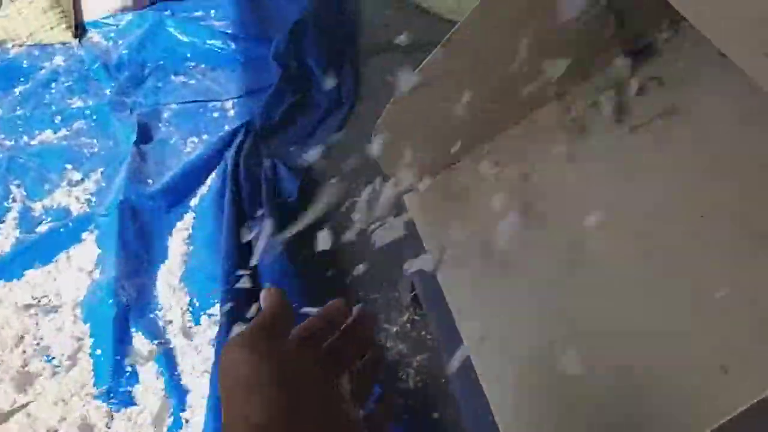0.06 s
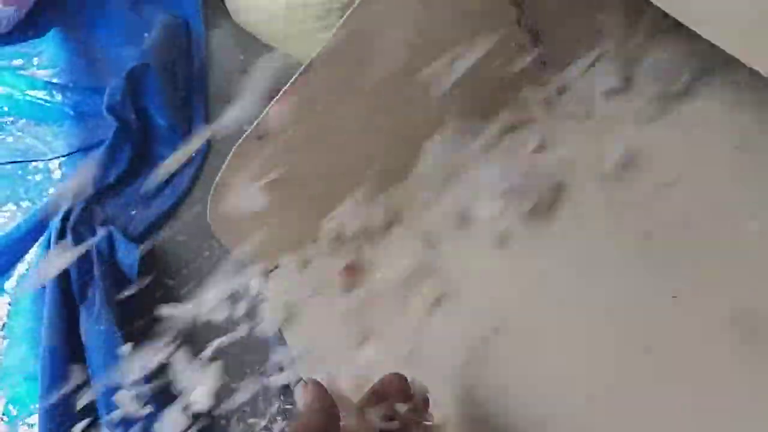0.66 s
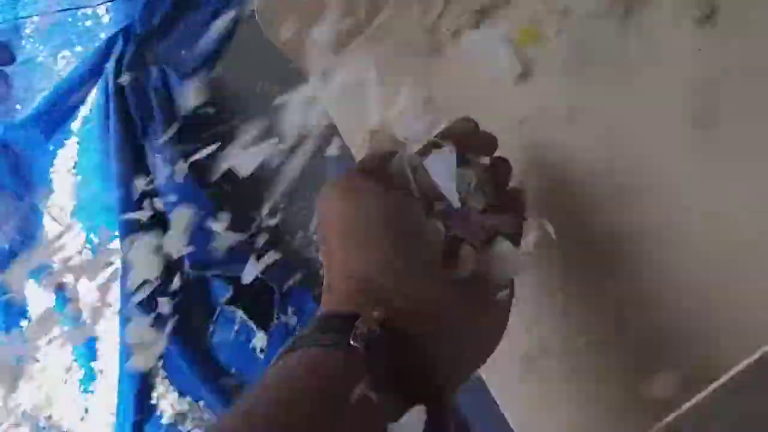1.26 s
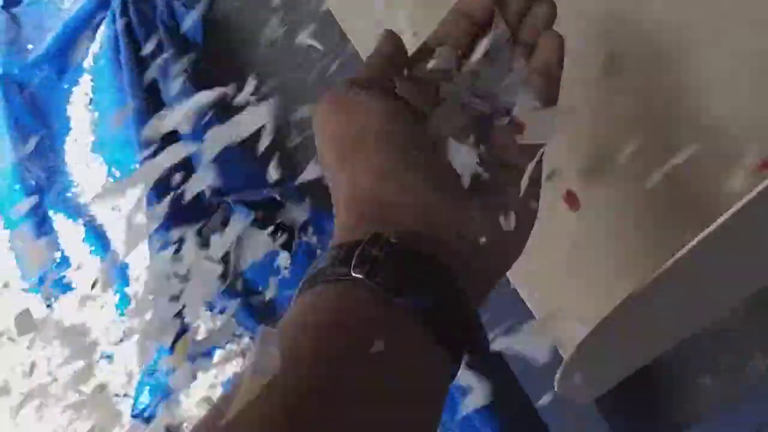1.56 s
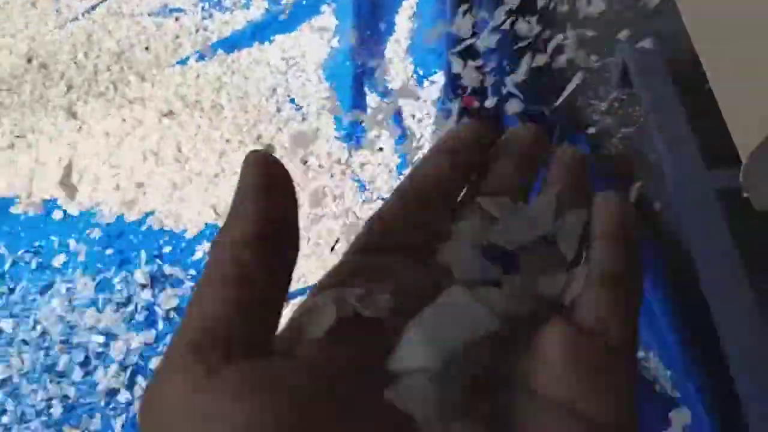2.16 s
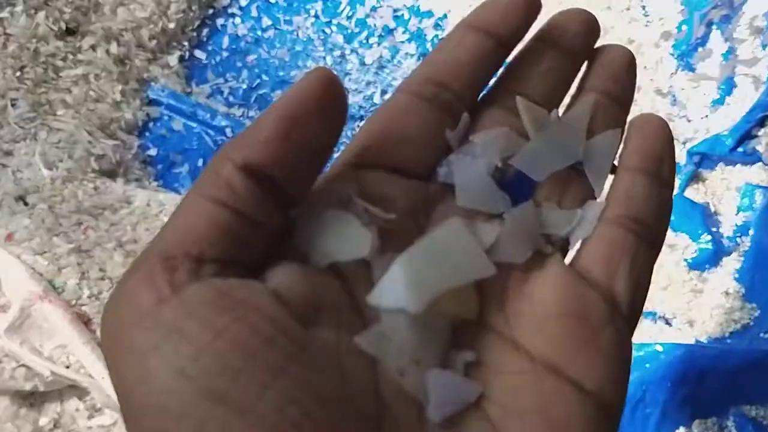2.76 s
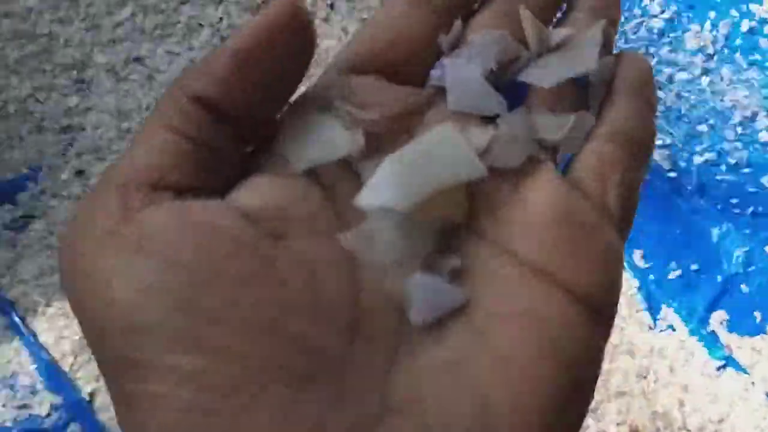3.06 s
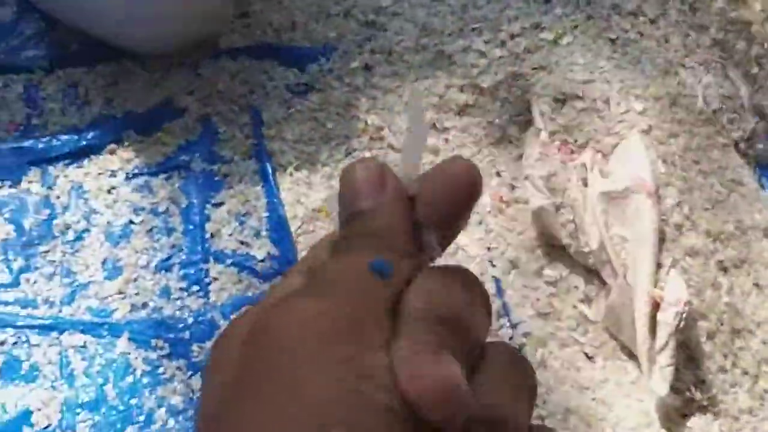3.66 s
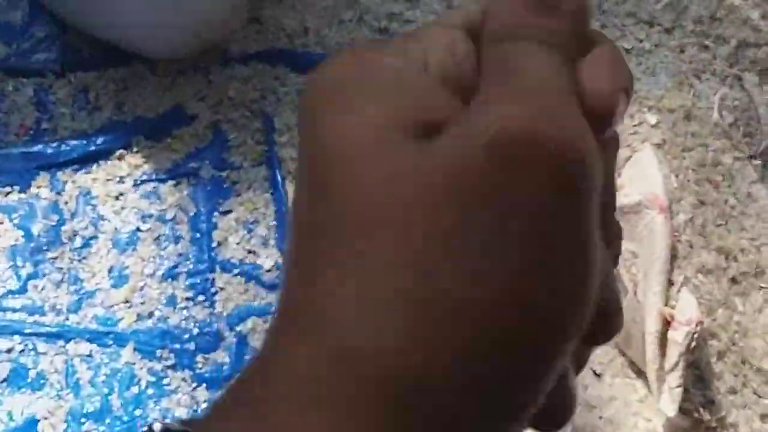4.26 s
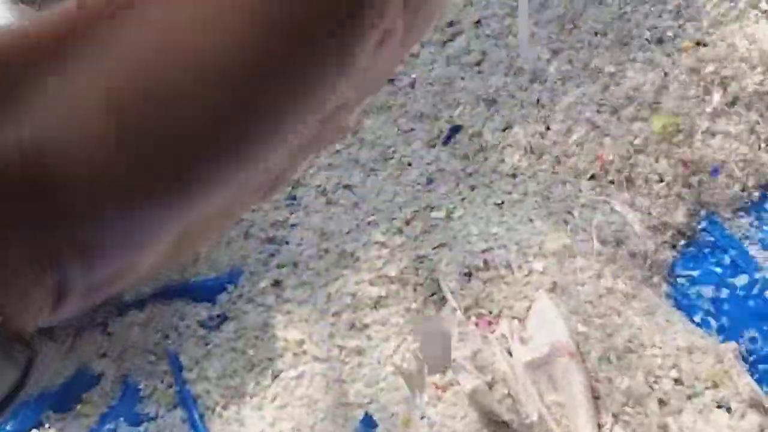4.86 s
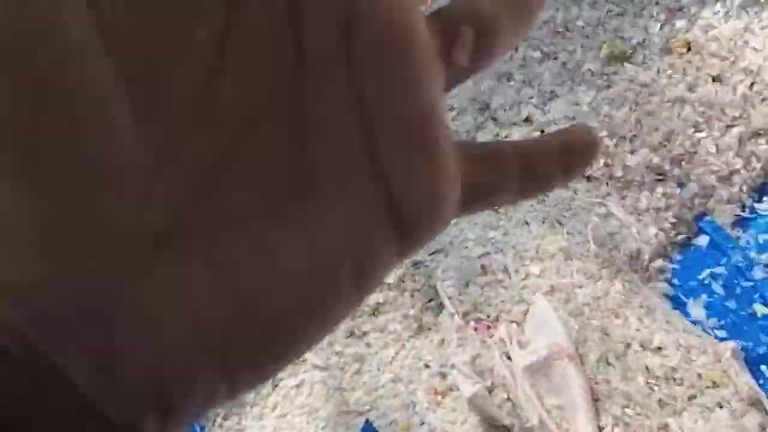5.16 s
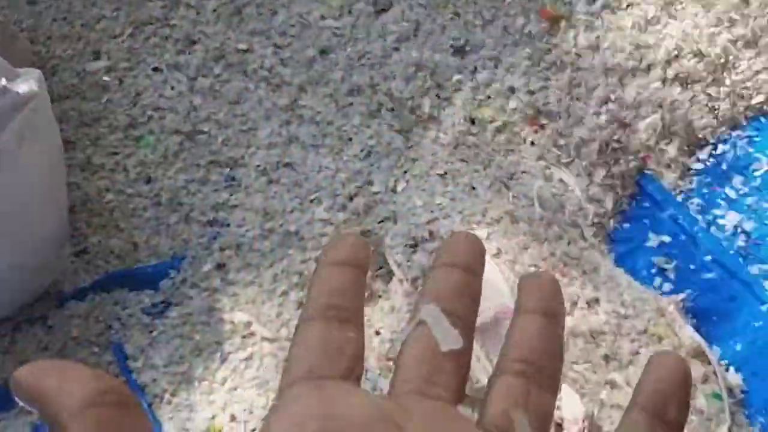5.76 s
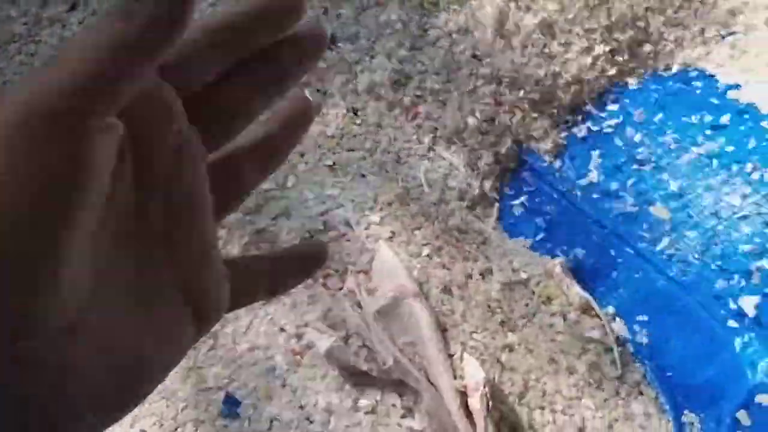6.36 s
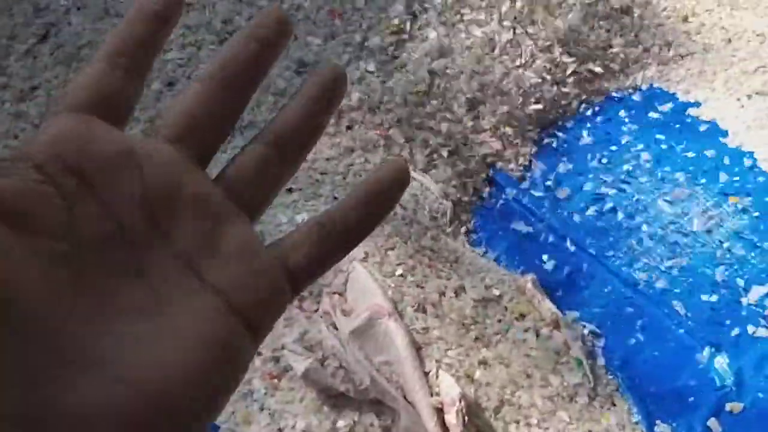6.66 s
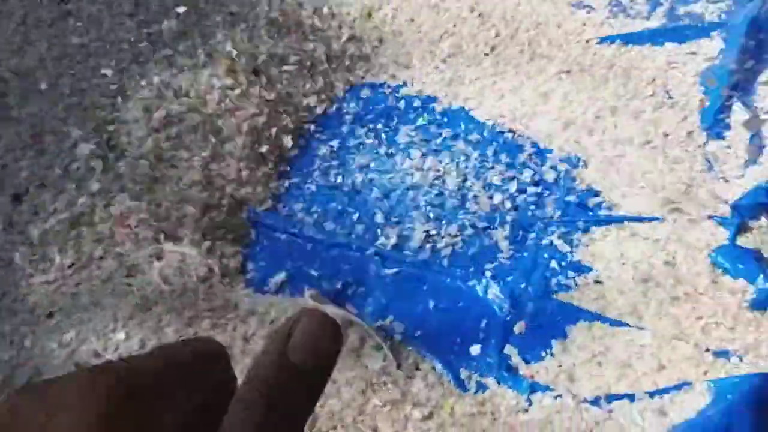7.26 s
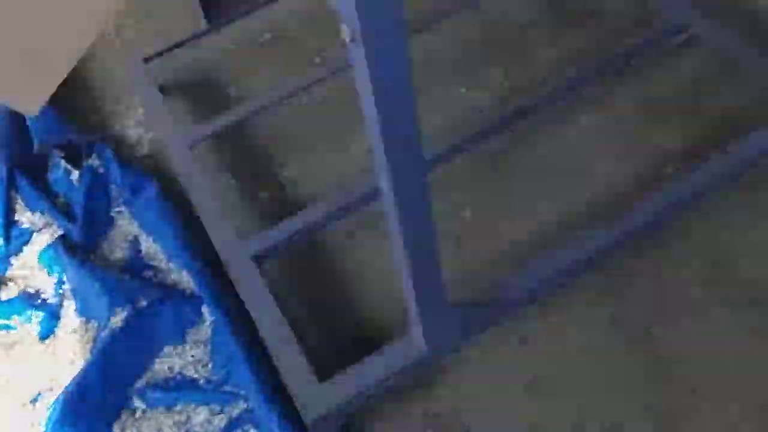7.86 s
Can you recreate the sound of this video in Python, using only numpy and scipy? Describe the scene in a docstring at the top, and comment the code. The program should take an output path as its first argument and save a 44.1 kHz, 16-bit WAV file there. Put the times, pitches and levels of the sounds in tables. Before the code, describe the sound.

From the first instant, a dense hail of plastic flakes rattles round a dryer's steel drum and blows from the chute, a bright, wide hiss full of tiny ticks. Beneath it run hollow rushing air, a low blower rumble and the drum's hum. The flow throbs slightly, about five times a second, with brief small surges and a dull puff at 0.3 seconds. A light draught buffets the microphone, fading between 1.4 and 2 seconds. Near 1.5 seconds, flakes land on a palm with a soft, dull slap. The hail eases a little from about 1.5 to 3.5 seconds, then recovers. A faint motor whine rises around 2.5 seconds and again from 3.5 to 4.2. A tiny, dull tap comes at 4.5 seconds as the flakes are tossed away. The low drone grows slightly near 7.5 seconds, and everything is still running at the end, near 8 seconds.

```python
"""Plastic scrap in a centrifugal dryer.

Heard in a workshop yard, beside the outlet chute: a hail of flakes is flung round the steel drum and
blown out with the air, while blower, drum and motor hum underneath. A hand catches a few flakes.
The listener starts in the draught of the chute, steps out of it, turns away and turns back."""
import sys
import numpy as np
from scipy import signal
from scipy.fft import rfft, irfft
from scipy.io import wavfile
from scipy.ndimage import map_coordinates

SR = 44100
rng = np.random.default_rng(int(sys.argv[2]) if len(sys.argv) > 2 else 0)


def pcm_store(signal):
    """Save signal as 16-bit PCM."""
    levels = np.round(np.clip(np.atleast_2d(signal), -1, 1) * 32767)
    wavfile.write(sys.argv[1], SR, levels.astype(np.int16).T)


N = 348390
TIME = np.arange(N) / SR
BINS = np.maximum(np.arange(N // 2 + 1) * SR / N, 1)


# Flake faders as the listener moves (time [s], level [dB], sizzle [dB], wall clatter [dB])
FLAKE_FADERS = [(0.0, -15, -2.5, -6), (1.05, -16, -2.2, -5), (1.6, -18, -2, -5.5), (2.1, -18.5, -3.5, -6),
                (3.2, -18, -4.5, -6), (3.8, -17, -5, -6.5), (4.8, -15.5, -4.5, -6), (6.3, -16.5, -3, -5.5),
                (7.3, -15, -4, -6.5), (7.9, -15, -4.5, -4.5)]
def flakes():
    """The hail in the drum and the bright ticks of flakes landing close by ride the flow together."""
    level_db, sizzle_db, clatter_db = in_time(FLAKE_FADERS)
    far = from_db(2.5) * hail(sizzle_db + 4.5, clatter_db + 6.5)
    ticks = clinks(per_s=600, spread_db=3, t60=0.048, low_hz=1508, high_hz=12970)
    near = from_db(1.4 * sizzle_db - 4) * ticks
    pan = from_db([[-.25], [.25]])
    return from_db(level_db + flow_db()) * (far + near) * pan


# EQ of the hail (frequency [Hz], gain [dB])
HAIL_EQ = [(700, -27), (960, -10), (1120, 0.2), (1700, -2.3), (2300, -0.66), (3600, -0.74), (4500, 0),
           (5700, -2), (7000, 0), (7800, -3.5), (10000, -6), (12200, -3.5), (14000, -6), (15800, -10)]
def hail(sizzle_db, clatter_db):
    """Countless flakes strike the drum and chute in a rush of air; each clump has its own colour."""
    strikes = rms_one(impacts(per_s=18000, spread_db=3))
    air = from_db(2.5) * rng.standard_normal((2, N))
    ringing = from_db(-5) * clinks(per_s=950, spread_db=1.5, t60=0.061, low_hz=998, high_hz=7573)
    spectrum = rfft(at_ports(strikes + air + ringing, HAIL_EQ))
    clump_db = 0.44 * drift(25)   # small clumps swell all bands together
    edges = np.r_[0, np.geomspace(1400, 16000, 12)[:-1], SR]
    out = 0
    for low, high in zip(edges, edges[1:]):
        band = irfft(spectrum * ((BINS >= low) & (BINS < high)), N)
        # the treble beams out of the mouth, the low clatter comes through the drum wall
        beam = np.interp(low, [4500, 9000, 13000], [0, .9, 1.4])
        wall = np.interp(low, [1400, 2700], [1, 0])
        flicker_db = 0.82 * drift(28)
        out = out + band * from_db(clump_db + flicker_db + beam * sizzle_db + wall * clatter_db)
    return out


def impacts(per_s, spread_db):
    """Flakes hit as random clicks of uneven size, different in each channel."""
    sizes = from_db(spread_db * np.minimum(rng.exponential(1, (2, N)), 5))
    signs = rng.choice([-1, 1], (2, N))
    return sizes * signs * (rng.random((2, N)) < per_s / SR)


def clinks(per_s, spread_db, t60, low_hz, high_hz):
    """Hard chips set the steel ringing, each at its own pitch and with its own phase in each channel."""
    start, pitch, size, left, right = rng.random((int(per_s * N / SR), 5)).T[:, :, None]
    age = np.arange(1100) / SR   # each ring is cut at 25 ms
    envelope = from_db(-spread_db * np.log(np.maximum(size, .05)) - 60 * age / t60)
    hz = low_hz * (high_hz / low_hz) ** np.sqrt(pitch)   # high pitches are the most common
    samples = ((start * N).astype(int) + np.arange(len(age))).ravel()
    channels = []
    for phase in (left, right):
        rings = envelope * np.sin(2 * np.pi * (hz * age + phase))
        channels.append(np.bincount(samples, rings.ravel(), N)[:N])
    return rms_one(np.array(channels))


# Swells as large clumps go through (time [s], boost [dB])
CLUMP_CUES = [(.14, 1.2), (1.54, 1.4), (2.2, 1.2), (2.68, 1.4), (3.68, 1.2), (4.46, 0), (4.7, 0),
              (7.66, 1.2)]
def flow_db(throb_hz=5.03, throb_db=0.28, crest_s=0.114):
    """The flow of flakes throbs evenly and surges with large clumps."""
    throb = throb_db * np.cos(2 * np.pi * throb_hz * (TIME - crest_s))
    return throb + sum(boost_db * swell(s, half_s=0.037) for s, boost_db in CLUMP_CUES)


# Slaps as the hand catches flakes and tosses them away (time [s], decay [s], level [dB])
SLAP_CUES = [(1.465, 0.0091, -20.5), (4.479, 0.0013, -18)]
# EQ of a slap on skin (frequency [Hz], gain [dB])
PALM_EQ = [(700, -27), (1100, 4), (1500, -1), (2100, -11), (3500, -12), (8000, -40)]
def palm():
    """Skin damps the flakes, so they land with short, dull slaps."""
    envelope = 0
    for start_s, decay_s, level_db in SLAP_CUES:
        age = np.maximum(TIME - start_s, 0) / decay_s
        envelope = envelope + from_db(level_db) * age * np.exp(1 - age)
    return envelope * at_ports(rng.standard_normal((2, N)), PALM_EQ)


# Fader of the air in the duct (time [s], level [dB])
DUCT_FADER = [(0, -34.5), (1.2, -34.5), (1.8, -39), (3.6, -38.5), (4.5, -35.5), (5.5, -37.5), (6.6, -37),
              (7.9, -39)]
# Hollow EQ of the duct (frequency [Hz], gain [dB])
DUCT_EQ = [(250, -15), (400, -5.5), (500, -4), (630, 1.5), (780, -1.5), (920, -1.5), (1200, -13),
           (2000, -38)]
def duct_air():
    """Air rushes through the duct; one wad of flakes leaves the chute with a dull puff."""
    level_db, = in_time(DUCT_FADER)
    puff_db = 6 * swell(0.295, half_s=0.038)
    return from_db(level_db + .5 + puff_db) * rush(DUCT_EQ, lumpy_db=1.5)


# Fader of the low drone where the listener stands (time [s], level [dB])
DRONE_FADER = [(0.0, -32.5), (1.0, -35.5), (1.25, -39), (2.3, -36.5), (3.1, -36.9), (4.5, -34),
               (6.6, -33.5), (7.5, -31), (7.9, -33)]
# EQ of the casing's rumble (frequency [Hz], gain [dB])
CASING_EQ = [(15, -42), (30, -27), (45, -8), (65, -5), (100, -4.5), (160, -1), (200, -0.5), (270, 2),
             (350, 0), (480, -10), (800, -31)]
# Partials of the blower (harmonic [number], level [dB])
BLOWER_PARTIALS = [(1, -21), (2, -14), (4, -3), (5, -1), (6, -9), (7, -8), (8, -4.5), (10, -12), (11, -10),
                   (12, -14.5), (15, -14.5), (16, -11), (17, -23), (18, -13), (19, -6)]
# The blower's third harmonic comes and goes along its standing wave (time [s], level [dB])
THIRD_FADER = [(0.0, -46), (1.3, -58), (2.5, -46), (3.3, -54), (4.4, -55), (4.9, -54), (5.7, -55),
               (7.2, -47), (7.6, -40), (7.9, -40.5)]
def blower_drone(in_stream, turn_hz=43.03):
    """The casing rumbles and the blower hums, both a little softer inside the air stream."""
    drone_db, = in_time(DRONE_FADER)
    third_db, = in_time(THIRD_FADER)
    rumble = from_db(drone_db - 3.5 - 2.5 * in_stream) * rush(CASING_EQ, lumpy_db=1.4)
    hum = shaft(turn_hz, BLOWER_PARTIALS, wander=0.00039, waver_db=0.44, apart_rad=0.51)
    third = shaft(turn_hz, [(3, 0)], wander=0.00058, waver_db=0, apart_rad=0.37)
    return rumble + from_db(drone_db - 7 - 3.5 * in_stream) * hum + from_db(third_db) * third


# Fader of the drum's hum, strongest in front of the chute (time [s], level [dB])
DRUM_FADER = [(0.0, -41.2), (0.9, -36.5), (1.3, -45), (2.1, -42.5), (3.6, -49.5), (5.0, -44.5), (7.4, -45),
              (7.9, -41)]
# Partials of the drum (harmonic [number], level [dB])
DRUM_PARTIALS = [(13, -14), (14, -13.5), (25, -10), (26, -26), (31, -7.5), (32, 1), (37, -8.5), (38, -26),
                 (43, -6), (44, -15), (45, -8.5), (51, -11.5), (56, -12.5), (57, -6.5), (88, -18),
                 (102, -19)]
def drum_hum(turn_hz=7.14):
    """The spinning drum hums on high multiples of its slow turn."""
    level_db, = in_time(DRUM_FADER)
    hum = shaft(turn_hz, DRUM_PARTIALS, wander=0.00042, waver_db=0.3, apart_rad=0.86)
    return from_db(level_db - 0.6) * hum


# The whine comes and goes along its standing wave (time [s], level [dB])
WHINE_FADER = [(0, -58), (1.85, -54), (2.35, -43), (2.65, -42.5), (3.15, -55), (3.45, -41.5), (4.2, -39.5),
               (4.4, -47), (7.2, -51), (7.9, -48)]
# Partials of the motor (harmonic [number], level [dB])
MOTOR_PARTIALS = [(4, -10), (6, -16), (24, 4.5)]
def motor_whine(turn_hz=24.88):
    """The motor whines above the drone, mostly at 24 times its turning rate."""
    level_db, = in_time(WHINE_FADER)
    whine = shaft(turn_hz, MOTOR_PARTIALS, wander=0.00029, waver_db=0.4, apart_rad=0.15)
    return from_db(level_db - 4) * whine


def draught(in_stream, level_db=-42, fall_db=26):
    """Air from the chute buffets each microphone port on its own and dies away outside the stream."""
    low_band = signal.butter(2, [85, 222], "band", fs=SR, output="sos")
    buffeting = rms_one(signal.sosfilt(low_band, rng.standard_normal((2, N))))
    gust_db = 1.5 * np.array([drift(8), drift(8)])
    return buffeting * from_db(level_db - fall_db * (1 - in_stream) + gust_db)


def shaft(turn_hz, partials, wander, waver_db, apart_rad):
    """A shaft hums on multiples of its rate; standing waves sway each one's level and stereo phase."""
    turns = turn_hz * np.cumsum(1 + wander * drift(0.47)) / SR
    out = 0
    for harmonic, level_db in partials:
        apart = apart_rad * drift(0.26) * np.array([[.5], [-.5]])
        tone = np.sin(2 * np.pi * (harmonic * turns + rng.random()) + apart)
        out = out + np.sqrt(2) * from_db(level_db + waver_db * drift(1)) * tone
    return out


def rush(eq, lumpy_db):
    """Turbulent air, coloured by what it flows through."""
    return at_ports(rng.standard_normal((2, N)), eq) * from_db(lumpy_db * drift(13))


# Stereo image, narrow lows and wide highs (frequency [Hz], left-right likeness [0-1])
STEREO_LIKENESS = [(50, 0.74), (300, 1), (650, 0.5), (1000, 0.38), (1550, 0.45), (2400, 0.02), (4000, 0.15),
                   (8000, 0), (16000, 0)]
def at_ports(pair, eq):
    """Two unrelated signals are coloured and reach the microphone's two ports partly alike; rms 1."""
    shared, separate = rfft(pair) * from_db(over_hz(eq))
    alike = over_hz(STEREO_LIKENESS)
    left = alike * shared + np.sqrt(1 - alike ** 2) * separate
    return rms_one(irfft(np.array([left, shared]), N))


# The left channel trails the right as the listener turns (time [s], delay [ms])
LEFT_DELAY = [(0, 0.2), (1.2, 0.2), (3, 0.405), (6.8, 0.412), (7.9, 0.19)]
def turning(pair):
    """Sound reaches the left port later, by a delay that follows the listener's angle."""
    left, right = pair
    delay_ms, = in_time(LEFT_DELAY)
    delayed = map_coordinates(left, [(TIME - delay_ms / 1000) * SR], order=5, mode="mirror")
    return np.array([delayed, right])


def drift(rate_hz):
    """Smooth random movement with rms 1, mostly slower than rate_hz."""
    hop, run_in = 40, 2000
    pole = np.exp(-2 * np.pi * rate_hz * hop / SR)
    noise = rng.standard_normal(N // hop + run_in + 2)
    slow = signal.lfilter([1], [1, -2 * pole, pole * pole], noise)[run_in:]
    return np.interp(np.arange(N) / hop, np.arange(len(slow)), rms_one(slow))


def swell(centre_s, half_s):
    """A smooth bump of height 1."""
    return np.exp(-((TIME - centre_s) / half_s) ** 2)


def in_time(rows):
    """Each column of an automation table, sample by sample."""
    times, *columns = np.transpose(rows)
    return [np.interp(TIME, times, column) for column in columns]


def over_hz(points):
    """A curve through the points on a log frequency axis."""
    hz, value = np.transpose(points)
    return np.interp(np.log(BINS), np.log(hz), value)


def from_db(db):
    """Decibels to gain."""
    return 10 ** (np.asarray(db) / 20)


def rms_one(x):
    """Scale to rms 1."""
    return x / np.sqrt(np.mean(x ** 2) + 1e-20)


def scene():
    """Flakes up front, air and machine hum beneath, and the draught on the microphone."""
    leave_s, leave_takes_s = 1.4, 0.56   # the listener steps out of the air stream
    in_stream = np.clip(1 - (TIME - leave_s) / leave_takes_s, 0, 1)
    chute = flakes() + palm() + duct_air()
    machine = blower_drone(in_stream) + drum_hum() + motor_whine()
    shade_db = -2.5 * swell(1.27, half_s=0.17)   # the reaching hand shades the microphone
    return turning(chute + from_db(shade_db) * machine) + draught(in_stream)


def record(dry, ceiling=0.95, cutoff_hz=15850):
    """A soft clip rounds the highest peaks and a steep low-pass cuts the top."""
    rounded = dry / (1 + np.abs(dry / ceiling) ** 6) ** (1 / 6)
    return irfft(rfft(rounded) / np.sqrt(1 + (BINS / cutoff_hz) ** 600), N)


dry = scene()
out = record(dry)
pcm_store(out)
```